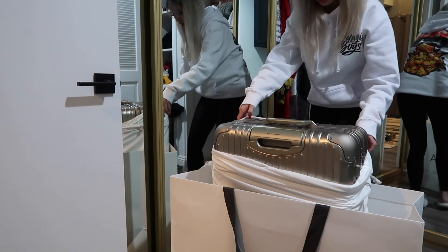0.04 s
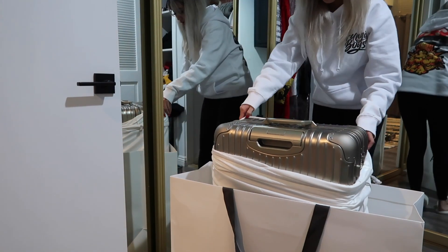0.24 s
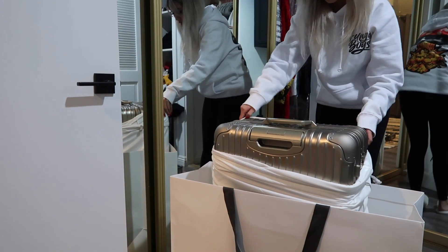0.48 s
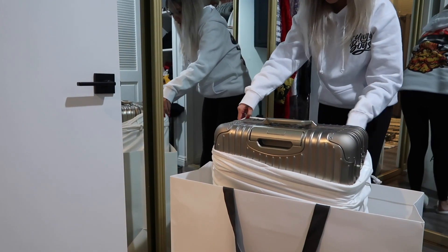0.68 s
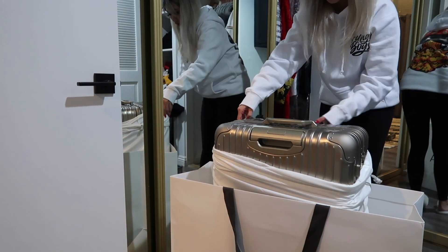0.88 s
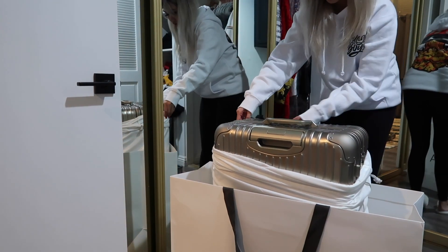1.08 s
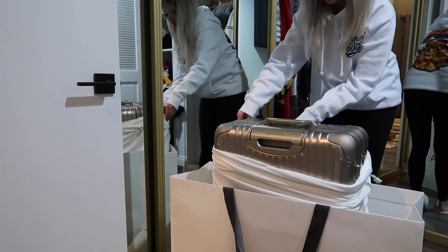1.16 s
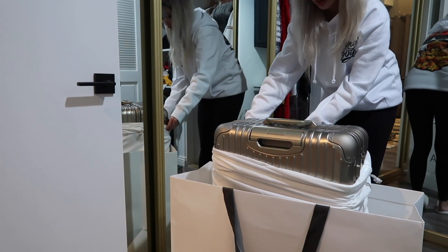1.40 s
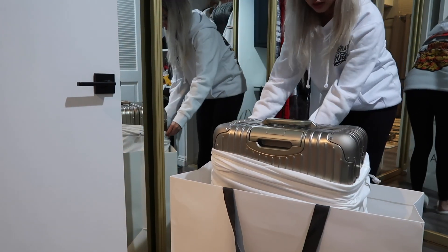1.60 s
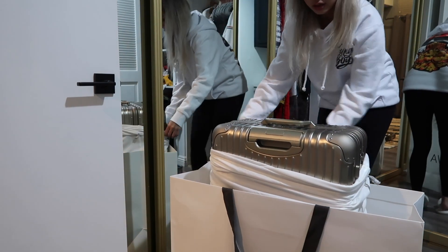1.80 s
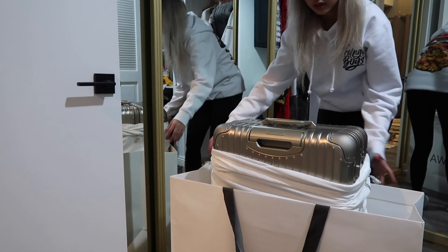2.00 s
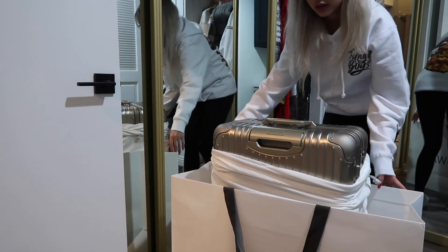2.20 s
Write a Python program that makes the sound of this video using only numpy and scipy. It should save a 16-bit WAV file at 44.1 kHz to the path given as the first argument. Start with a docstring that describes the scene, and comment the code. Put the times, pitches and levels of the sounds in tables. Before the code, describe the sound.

Hollow knock of a metal suitcase, a sharp handle click, then soft rubbing and light bumps.

```python
"""A metal suitcase in a cloth cover, handled inside a paper bag, drops against the floor with a hollow
knock and is bumped again. Each knock excites the hollow modes of the case and the dense modes of its
ribbed shell. The handle snaps down with a metallic click, and soft bumps pass through the floor.
Sleeves and hands slide over the case, making friction noise coloured by its resonances.
The small, quiet room adds a short reverberation, and ventilation hums underneath."""
import sys
import numpy as np
from scipy import signal
from scipy.fft import rfft, irfft, next_fast_len
from scipy.io import wavfile

SR = 44100
rng = np.random.default_rng(int(sys.argv[2]) if len(sys.argv) > 2 else 0)


def file_out(sig):
    """Save sig as 16-bit WAV at sys.argv[1]."""
    # one column per channel
    cols = np.atleast_2d(sig).T
    # limit, then scale
    lim = np.clip(cols, -1, 1)
    pcm = np.round(lim * 32767).astype(np.int16)
    wavfile.write(sys.argv[1], SR, pcm)


N = 99225


def amp(db):
    """Converts decibels to an amplitude ratio."""
    return 10 ** (np.asarray(db) / 20)


def unit(x):
    """Normalises to an rms of 1."""
    return x / np.sqrt(np.mean(x ** 2) + 1e-20)


def read(points, hz):
    """Interpolates a table on a logarithmic frequency axis."""
    f, value = np.transpose(points)
    return np.interp(np.log(hz + 1), np.log(f + 1), value)


def add(mix, start_s, sound):
    """Superposition: a sound adds to the mix from its start time."""
    part = mix[max(round(start_s * SR), 0):][:len(sound)]
    part += sound[:len(part)]


def fade(t, t60):
    """Exponential damping: 60 dB of decay in t60 seconds."""
    return amp(-60 * t / t60)


def shaped(x, gain):
    """Zero-phase filtering by the response gain(Hz)."""
    return irfft(rfft(x) * gain(np.fft.rfftfreq(N, 1 / SR)), N)


def colour(x, gain, size=4096):
    """Minimum-phase filtering, of unit energy, with the shape gain(Hz)."""
    magnitude = np.maximum(gain(abs(np.fft.fftfreq(size, 1 / SR))), 1e-5)
    response = np.exp(np.conj(signal.hilbert(np.log(magnitude))))
    taps = np.fft.ifft(response).real[:size // 2]
    return signal.fftconvolve(x, taps / np.linalg.norm(taps))[:len(x)]


def whiten(burst):
    """Whitening flattens a burst's spectrum, keeping its energy and rough envelope."""
    size = next_fast_len(2 * len(burst))
    spectrum = rfft(burst, size)
    flat = irfft(spectrum / (abs(spectrum) + 1e-12), size)[:len(burst)]
    return flat * np.linalg.norm(burst) / np.linalg.norm(flat)


def reflections(x, size=256):
    """Reverberation: dense echoes build up, then each band decays at its own rate."""
    # Each row: frequency in Hz, reverberation time (t60) in seconds.
    decay_times = [(80, 0.62), (300, 0.4), (1000, 0.46), (3000, 0.29), (14000, 0.28)]
    onset = np.clip(np.arange(SR) / SR / 0.0041 - .5, 0, 1)
    hz, t, bands = signal.stft(rng.standard_normal(SR) * onset, SR, nperseg=size)
    tail = signal.istft(bands * fade(t, read(decay_times, hz)[:, None]), SR, nperseg=size)[1]
    return signal.fftconvolve(x, tail / np.linalg.norm(tail))[:N]


def room(x, wet_db, bass_cut_hz=270):
    """Direct and reverberant sound at two close points: coherent in the bass, less so in the treble."""
    # Each row: frequency in Hz, gain of the side signal in dB.
    width = [(100, -49), (300, -65), (1000, -22), (2500, -12.5), (4000, -5.5), (6000, 0.5), (9000, 4.5),
             (12000, 12.5)]
    mid = x + amp(wet_db) * shaped(reflections(x), lambda f: f / np.hypot(f, bass_cut_hz))
    quadrature = 0.59 * signal.hilbert(x).imag
    side = shaped(quadrature + amp(wet_db + 1) * reflections(x), lambda f: amp(read(width, f)))
    return np.array([mid + side, mid - side])


def ventilation(hum_hz=158.8, hum_db=-47.5, waver_depth=0.033, air_db=-51, side_db=-57):
    """A hum with slight random amplitude modulation lies in broadband air noise."""
    # Air noise spectra, mid and side. Each row: frequency in Hz, relative level in dB.
    air_mid = [(15, -41), (25, -15), (80, -6), (163, -12.5), (207, -13), (250, -10), (326, -28),
               (927, -26.5), (6370, -41.5), (11800, -49.5), (15000, -83)]
    air_side = [(60, -31), (220, -3), (450, -5), (2400, -15), (6000, -22.5), (12500, -29), (15000, -46)]
    mid_noise, side_noise, waver_noise = rng.standard_normal((3, N))
    waver = 1 + waver_depth * unit(shaped(waver_noise, lambda f: np.exp(-f / 6)))
    hum = amp(hum_db) * np.sqrt(2) * waver * np.sin(2 * np.pi * hum_hz * np.arange(N) / SR)
    mid = hum + amp(air_db) * unit(shaped(mid_noise, lambda f: amp(read(air_mid, f))))
    side = amp(side_db) * unit(shaped(side_noise, lambda f: amp(read(air_side, f))))
    return np.array([mid + side, mid - side])


def rub(levels, spectrum, catches_per_s=510, hiss_db=2):
    """Sliding friction: tiny random catches over a smooth hiss follow the level of the stroke."""
    catches = (rng.random(N) < catches_per_s / SR) * rng.choice([-1, 1], N)
    drive = unit(unit(catches) + amp(hiss_db) * rng.standard_normal(N))
    stroke = amp(np.interp(np.arange(N) / SR, *np.transpose(levels)))
    return colour(drive * stroke, lambda f: amp(read(spectrum, f)))


def cloth_slide():
    """Friction of cloth on the case radiates a broadband swish."""
    # Each row: time in seconds, level in dB.
    stroke = [(0, -39), (.035, -65), (.07, -67), (.7, -68), (1.02, -61), (1.19, -50), (1.235, -49.5),
              (1.253, -38.5), (1.29, -53.5), (1.37, -50), (1.45, -57), (1.58, -52), (1.68, -55),
              (1.76, -72), (1.99, -58), (2.07, -70), (2.13, -53.5), (2.18, -77), (2.25, -57)]
    # Each row: frequency in Hz, relative level in dB.
    spectrum = [(150, -37), (400, -3), (800, -1), (2800, 2.5), (5000, -3), (7000, -9.5), (10000, -17),
                (15000, -33)]
    return rub(stroke, spectrum)


def hand_drag():
    """Friction of hands on the shell and the bag radiates a duller noise."""
    # Each row: time in seconds, level in dB.
    stroke = [(0, -53), (.03, -41.5), (.06, -61.5), (.1, -66.5), (.9, -62), (1.2, -56.5), (1.4, -55.5),
              (1.46, -63), (1.6, -55.5), (1.68, -49), (1.8, -55.5), (1.96, -58), (2.13, -59), (2.25, -54.5)]
    # Each row: frequency in Hz, relative level in dB.
    spectrum = [(100, -4), (250, -7), (380, 5.5), (540, -2.5), (1050, -7.5), (1900, -12.5), (4000, -19),
                (10000, -40.5)]
    return rub(stroke, spectrum)


def resonant_burst(length_s, db, hz, width, uneven_db=2, step_s=0.0153):
    """A short, uneven burst of noise in one resonance: a scrape, or a light knock's hollow body."""
    t = np.arange(0, length_s, 1 / SR)
    gains = amp(uneven_db * rng.standard_normal(size=64))
    swell = np.sqrt(abs(np.sin(np.pi * t / length_s)))
    envelope = swell * unit(np.interp(t / step_s, np.arange(len(gains)), gains))
    drive = np.pad(rng.standard_normal(SR)[:len(t)] * envelope, (0, SR // 20))
    return amp(db) * colour(whiten(drive), lambda f: (1 + (np.log((f + 1) / hz) / width) ** 2 / 2) ** -2)


def bump(db, hz, rise_s=0.011):
    """A padded push through the floor swells and dies as one low damped oscillation."""
    t = np.arange(SR // 2) / SR
    return amp(db) * np.sin(2 * np.pi * hz * t) * np.minimum(t / rise_s, 1) * fade(t, t60=.13)


def click(ring_db, ring_hz, tick_db, width=.19, grit_db=-17):
    """Hard contact of metal handle and fittings: a damped resonance and a broadband, gritty tick."""
    t = np.arange(SR // 10) / SR
    ring_noise, tick_noise = rng.choice([-1, 1], (2, len(t)))
    strike = whiten(ring_noise * fade(t, t60=0.008))
    ring = colour(strike, lambda f: 1 / (1 + (np.log((f + 1) / ring_hz) / width) ** 4))
    tick = whiten(tick_noise * (fade(t, t60=.004) + amp(grit_db) * fade(t, t60=.07)))
    return amp(ring_db) * ring + amp(tick_db) * tick


def knock(boom_db, clatter_db, cutoff_hz, boom_rise_s=0.0013, clatter_rise_s=0.0008, ring_db=-4.5):
    """Modal vibration: a blow rings the case's hollow modes and the dense modes of its ribbed shell."""
    # Each row: frequency in Hz, relative level in dB, decay time (t60) in seconds.
    hollow_modes = [(171.7, -4, 0.15), (213.2, 7, 0.15), (264, 1, 0.11), (295, -5, .1), (368.3, 0.5, 0.13),
                    (481, -5.5, 0.16), (620, -14, 0.09), (728, -26, 0.16), (865, -17.5, 0.2),
                    (1043, -22, 0.3), (1600, -9, 0.09), (1713, -16, 0.068), (3036, -16, 0.1),
                    (4200, -36, 0.038)]
    # The dense modes overlap into noise. Each row: frequency in Hz, relative level in dB.
    shell_spectrum = [(100, -9.5), (400, -1.5), (600, -5), (950, 2.5), (1380, -2.5), (1600, 2.5),
                      (2100, -2.5), (3020, 2), (3400, -6), (3750, -4), (6000, -9), (9000, -12),
                      (15000, -58)]
    t = np.arange(SR // 2) / SR
    modes = sum(amp(db) * fade(t, t60) * np.sin(2 * np.pi * hz * t) for hz, db, t60 in hollow_modes)
    boom = modes / 2 * (1 - np.exp(-t / boom_rise_s))
    decay = fade(t, t60=0.031) + amp(ring_db) * fade(t, t60=0.177)  # a crack, then ringing
    envelope = decay * (1 - np.exp(-t / clatter_rise_s))
    burst = whiten(rng.standard_normal(len(t)) * envelope)
    clatter = colour(burst, lambda f: amp(read(shell_spectrum, f)) / np.sqrt(1 + (f / cutoff_hz) ** 5))
    return amp(boom_db) * boom + amp(clatter_db) * clatter


def scene():
    """Impacts and handling noise reverberate in the room and superpose on the ventilation."""
    # Each row: start in seconds, boom gain in dB, clatter gain in dB, clatter cut-off in Hz.
    knocks = [(.022, -52, -40.5, 6130), (.201, -31.5, -38.5, 4200), (0.2466, -17, -20.5, 4540),
              (0.25, -13.5, -18.5, 2580), (0.2557, -14.5, -24.5, 5700), (.268, -15.5, -29.5, 3480),
              (0.276, -17, -44, 1550), (0.4848, -35.5, -29, 3840), (0.492, -35, -30.5, 3100),
              (0.5082, -31, -37, 4000), (.520, -30.5, -49.5, 4980), (1.2455, -49, -46, 4500),
              (1.254, -69, -44, 6500), (1.348, -72, -41, 3800), (1.359, -74, -41, 1900),
              (1.658, -39, -43.5, 2370), (2.0052, -39.5, -37, 3540), (2.0131, -29, -38, 2350),
              (2.141, -35, -47, 1850)]
    # Each row: start in seconds, ring gain in dB, ring frequency in Hz, tick gain in dB.
    clicks = [(0.255, -9.5, 4120, -46), (0.4843, -17.5, 2850, -37), (0.491, -28, 2855, -46),
              (1.2525, -41, 6350, -44), (2.008, -34, 3060, -72)]
    # Each row: start in seconds, gain in dB, frequency in Hz.
    bumps = [(.247, -21, 94.7), (.325, -29, 56), (.326, -24, 161.5), (0.495, -26.5, 92),
             (1.622, -35.5, 332), (1.678, -34, 137), (1.738, -31, 140), (2.235, -25.5, 150)]
    # Each row: start and length in seconds, gain in dB, resonance in Hz, relative width.
    bursts = [(.005, 0.049, -44, 405, 0.13), (0.017, 0.036, -45.5, 654, 0.083),
              (0, 0.055, -48.5, 4660, 0.33), (0.193, 0.062, -48, 2960, 0.4),
              (0.209, 0.039, -38.5, 616, 0.43), (1.144, 0.083, -51.5, 3200, 0.37),
              (1.172, 0.15, -60.5, 8500, 0.31), (1.25, 0.017, -42, 396, 0.17),
              (1.382, 0.39, -55, 1820, 0.24), (2.013, 0.038, -45, 320, 0.49),
              (2.031, 0.11, -56.5, 3250, 0.13)]
    impacts = np.zeros(N)
    handling = cloth_slide() + hand_drag()
    for events, source in ((knocks, knock), (clicks, click), (bumps, bump)):
        for start_s, *settings in events:
            add(impacts, start_s, source(*settings))
    for start_s, *settings in bursts:
        add(handling, start_s, resonant_burst(*settings))
    return room(impacts, wet_db=-9) + room(handling, wet_db=-4.5) + ventilation()


def record(dry, edge_hz=15800):
    """Band limiting: a linear-phase low-pass filter removes the highest treble."""
    low_pass = signal.firwin(511, edge_hz, window=("kaiser", 9), fs=SR)
    return signal.oaconvolve(dry, low_pass[None], "same")


dry = scene()
out = record(dry)
file_out(out)
```